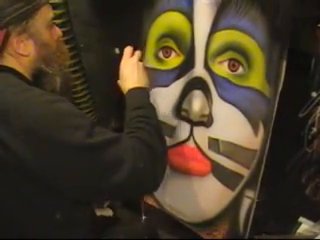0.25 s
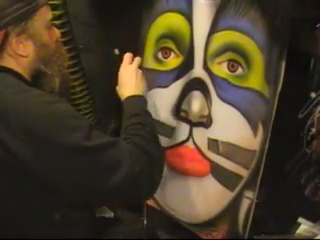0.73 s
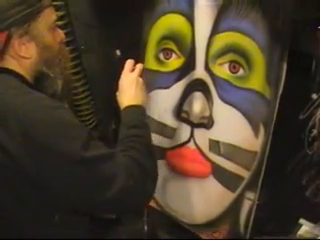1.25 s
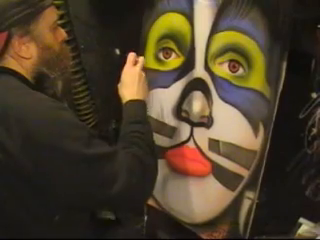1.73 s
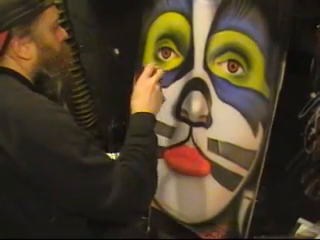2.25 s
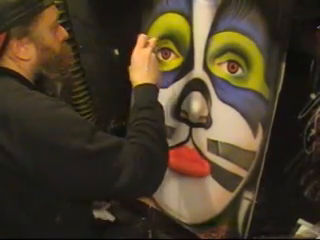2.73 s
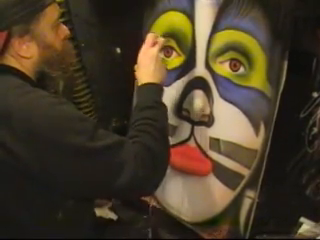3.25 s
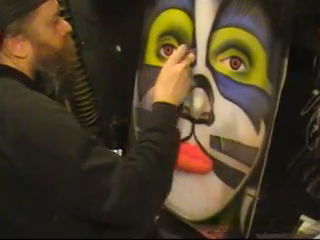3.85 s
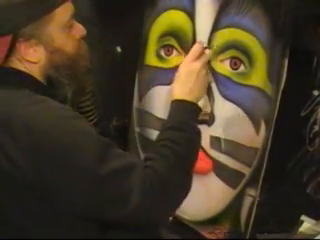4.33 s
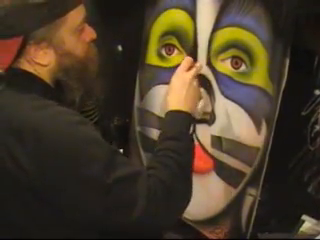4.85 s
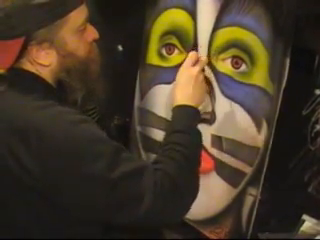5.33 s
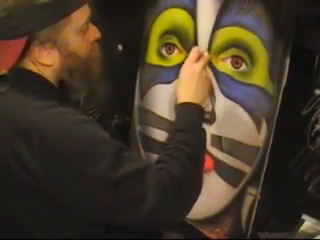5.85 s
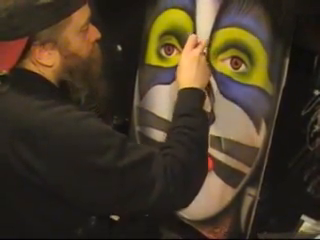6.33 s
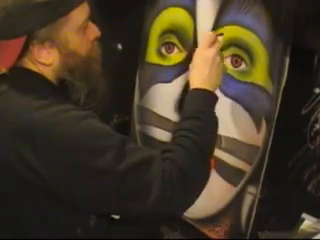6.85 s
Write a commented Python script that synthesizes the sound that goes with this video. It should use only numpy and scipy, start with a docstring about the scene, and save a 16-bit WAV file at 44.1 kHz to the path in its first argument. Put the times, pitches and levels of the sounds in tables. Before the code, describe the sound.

An airbrush is already spraying at the start, a bright, close hiss of air that flutters slightly in tone. During this first stroke the jet also drums softly on the stretched canvas, adding an uneven low rumble. The hiss cuts off at about 2.3 seconds, returns at 2.4 and runs until 3.5. In the pause, at 3.8 seconds, the valve gives one short, sharp spit of air. A louder stroke runs from 4 to about 5.8 seconds. After a brief gap, the last stroke starts at 6 seconds and swells until the end, at around 7 seconds. Beneath it all are a faint, deep hum that wavers in pitch, a faint fan and steady room air. The space is a small studio with very little echo.

```python
"""An airbrush is already hissing in a small studio, its air jet drumming on the canvas for the first stroke.
A second stroke follows, then the valve spits once in the pause, at 3.8 s. Two louder strokes carry
the hiss to the end. A wavering low hum, a faint fan and room air lie beneath all of it, and the
camcorder notches out every multiple of its tape drum's rate throughout."""
import sys
import numpy as np
from scipy import signal
from scipy.fft import rfft, irfft, next_fast_len
from scipy.io import wavfile
from scipy.ndimage import uniform_filter1d

SR = 44100
rng = np.random.default_rng(int(sys.argv[2]) if len(sys.argv) > 2 else 0)


def generate_wav(sig):
    """Save sig (samples, or channels by samples) to the path in sys.argv[1] as 16-bit PCM at SR."""
    pcm = np.round(np.clip(np.atleast_2d(sig).T, -1, 1) * 32767).astype(np.int16)
    wavfile.write(sys.argv[1], SR, pcm)


N = 312655
T = np.arange(N) / SR
FFT_SIZE = next_fast_len(N)
HZ = np.arange(FFT_SIZE // 2 + 1) * SR / FFT_SIZE + 1e-3

# Fader and tone rides, one list per stroke; each tone ride acts by its swing about its own average:
# (time [s], relative hiss level [dB], canvas roar [dB], nozzle ring [dB], top end [dB])
STROKE_RIDES = [
    [(0.0, -30, -5, -4, 0), (0.02, -28, -7, -5, -2), (0.36, -29, -5, -1, -2), (0.48, -28, -7, -5, -1),
     (0.79, -29, -6, -2, -2), (0.88, -30, -10, -7, -3), (0.98, -29, -5, 1, -2), (1.12, -27, -8, -3, -3),
     (1.23, -28, -12, -10, -3), (1.32, -29, -6, 1, -3), (1.46, -28, -7, -4, -2), (1.48, -26, -7, -3, -4),
     (1.58, -29, -10, -6, -1), (1.75, -30, -8, -6, -2), (1.76, -32, -8, 0, 1), (1.77, -27, -7, -4, -5),
     (1.87, -29, -5, 0, -1), (2.12, -27, -8, -3, -3), (2.14, -26, -9, 0, -4), (2.21, -28, -8, -7, -3),
     (2.25, -28, -9, -6, -1)],
    [(2.45, -27, -8, -6, -3), (2.512, -26, -6, -1, -3), (2.624, -27, -6, -3, -3), (2.71, -30, -8, -7, -2),
     (2.758, -28, -6, -2, -3), (3.038, -28, -7, -2, -2), (3.172, -29, -7, -6, 0), (3.196, -29, -5, -2, -3),
     (3.282, -27, -8, -5, -4), (3.42, -26, -8, -2, -2), (3.436, -27, -10, -6, -3), (3.53, -27, -8, -7, -3)],
    [(3.975, -24, -9, -7, -2), (4.087, -23, -8, -6, -3), (4.187, -24, -12, -9, -3),
     (4.221, -26, -6, -3, -1), (4.231, -24, -11, -3, -4), (4.289, -22, -9, -7, -3),
     (4.773, -24, -9, -6, -3), (4.793, -24, -12, -9, -2), (4.999, -27, -10, -6, -1),
     (5.015, -25, -9, -3, -3), (5.143, -22, -11, -7, -5), (5.173, -23, -9, -6, -3),
     (5.265, -24, -11, -11, -2), (5.315, -23, -10, -5, -5), (5.443, -25, -7, -4, -1),
     (5.473, -25, -12, -9, -3), (5.551, -23, -11, -4, -4), (5.679, -22, -9, -5, -4),
     (5.745, -25, -11, -11, -2)],
    [(5.975, -27, -10, -8, -2), (6.191, -26, -7, -3, -3), (6.315, -26, -9, -10, 0),
     (6.377, -25, -8, -4, -3), (6.517, -24, -8, -7, -3), (6.533, -24, -12, -12, -5),
     (6.601, -26, -13, -11, -2), (6.687, -26, -8, -4, -2), (6.899, -23, -9, -7, -4),
     (7.081, -21, -10, -8, -2), (7.09, -20, -11, -9, -5)],
]
# Tone of the hiss: (frequency [Hz], relative level [dB])
JET_EQ = [(210, -51), (350, -21), (447, -25), (646, -17), (1070, -17), (1860, -10), (2760, -11), (3120, -5),
          (3700, -10), (4310, -2), (5250, -4), (6920, 0), (10100, -4), (12000, -15), (13600, -29)]
# Stereo width of the hiss: (frequency [Hz], side against mid [dB])
JET_WIDTH = [(60, -9), (110, -2), (200, -4), (360, -5), (660, -8), (1200, -21), (2180, -37), (3960, -15),
             (7210, -14), (13100, -7)]
ROAR_HZ, RING_HZ, HISS_HZ, TOP_HZ = 2800, 4600, 6500, 10000  # where each ride acts most


def air_jet():
    """Turbulent air hisses from the nozzle; each third-octave band flutters on its own."""
    times, *rides = np.vstack(STROKE_RIDES).T
    hiss_db, roar_db, ring_db, top_db = (np.interp(T, times, ride) for ride in rides)
    swings = [ride - ride.mean() for ride in (roar_db, ring_db, np.zeros(N), top_db)]
    mid, side = rfft(rng.standard_normal((2, FFT_SIZE))) * eq_curve(JET_EQ)
    spectrum = stereo(mid, side * eq_curve(JET_WIDTH))
    hiss = 0
    for centre_hz in 320 * 2 ** (np.arange(17) / 3):
        window = np.cos(np.pi / 2 * np.clip(3 * np.log2(HZ / centre_hz), -1, 1)) ** 2
        band = irfft(spectrum * window, FFT_SIZE)[:, :N]
        # crossfade between the two nearest rides
        place = np.interp(np.log(centre_hz), np.log([ROAR_HZ, RING_HZ, HISS_HZ, TOP_HZ]), np.arange(4))
        below = min(int(place), 2)
        blend = place - below
        tone_db = (1 - blend) * swings[below] + blend * swings[below + 1]
        hiss = hiss + band * undb(tone_db + 1.2 * flutter(rate_hz=9))
    grain = undb(1.6 * flutter(rate_hz=700))  # eddies and paint droplets
    return at_level(hiss * grain, 3.5) * undb(hiss_db)


# Trigger presses, one per stroke: (open time [s], shut time [s])
TRIGGER_CUES = [(-1, 2.262), (2.437, 3.538), (3.960, 5.758), (5.958, 8)]


def valve_gate():
    """Air flow, 0 to 1: the valve snaps open and closes more slowly as the pressure bleeds off."""
    flow = np.zeros(N)
    for opens, shuts in TRIGGER_CUES:
        attack = 1 - np.exp(-np.clip(T - opens, 0, 1) / .004)
        release = np.exp(-np.clip(T - shuts, 0, 9) / .008)
        flow += attack * release
    return flow


# Drumming under the first stroke: (time [s], relative level [dB], upper modes against lower [dB])
CANVAS_RIDE = [(0.0, -49, 0), (0.04, -45, -6), (0.06, -54, 4), (0.18, -40, -1), (0.25, -36, 8),
               (0.3, -34, 2), (0.35, -40, 9), (0.37, -34, 0), (0.45, -42, 5), (0.52, -36, -1),
               (0.57, -42, -2), (0.77, -37, 5), (0.89, -47, -4), (0.91, -53, 2), (0.99, -38, -7),
               (1.01, -40, 0), (1.03, -38, -5), (1.19, -59, 10), (1.24, -53, 0), (1.38, -41, -3),
               (1.57, -61, 10), (1.61, -52, 3), (1.63, -61, 7), (1.74, -44, 1), (1.8, -41, -5),
               (1.83, -44, 3), (1.88, -39, -3), (1.95, -54, 6), (2.15, -63, 17)]
# Lower and upper resonances of the cloth: (frequency [Hz], width [Hz], relative level [dB])
CANVAS_LOW_MODES = [(230, 70, 0), (350, 110, -1), (500, 60, -4)]
CANVAS_HIGH_MODES = [(660, 70, 0), (830, 120, 0), (960, 60, -3), (1100, 60, -2)]


def canvas_drumming():
    """The stretched cloth rumbles in its modes where the jet presses close."""
    times, db, upper_db = np.transpose(CANVAS_RIDE)
    low = noise(resonances(CANVAS_LOW_MODES))
    high = noise(resonances(CANVAS_HIGH_MODES))
    low = at_level(low, -.3) * undb(np.interp(T, times, db, right=-90))
    high = at_level(high, -.3) * undb(np.interp(T, times, db + upper_db, right=-90))
    return (low + high) * undb(1.5 * flutter(rate_hz=60))


# The spit between strokes: (time [s], relative level [dB], time to fall 60 dB [s])
SPIT_CUES = [(3.829, -29, .1)]
# Its mid-heavy tone: (frequency [Hz], relative level [dB])
SPIT_EQ = [(290, -49), (500, -19), (1490, -4), (1780, -11), (2860, 0), (3460, -14), (5430, -20),
           (10200, -45), (13000, -67)]


def valve_spit():
    """The valve lets out a short burst of air with a sharp attack."""
    envelope = 0
    for start, db, t60 in SPIT_CUES:
        age = np.clip(T - start, 0, 9)
        attack = 1 - np.exp(-age / .002)
        envelope = envelope + attack * undb(db - 60 * age / t60)
    return envelope * at_level(noise(eq_curve(SPIT_EQ)), .1)


# Pitch and fader ride of the hum: (time [s], pitch [Hz], level [dB])
HUM_RIDE = [(0.0, 60.1, -64), (0.1, 56.1, -48), (0.53, 54.6, -52), (0.59, 53.4, -60), (0.67, 50.4, -57),
            (1.32, 50.4, -46), (1.54, 50.6, -56), (1.66, 56.6, -56), (1.81, 52.9, -50), (1.95, 53.7, -58),
            (2.05, 54.9, -51), (2.15, 50.9, -54), (2.35, 49.1, -57), (2.41, 49.5, -49), (2.65, 53.3, -51),
            (3.08, 53.2, -48), (3.22, 54.7, -48), (3.35, 54.5, -53), (3.45, 54.4, -44), (3.83, 54.6, -49),
            (4.05, 54.5, -44), (4.4, 54.6, -51), (4.5, 52.0, -56), (4.64, 54.9, -56), (4.72, 55.9, -47),
            (5.23, 56.0, -52), (5.39, 49.1, -52), (5.57, 49.1, -50), (5.69, 54.1, -46), (5.75, 55.7, -50),
            (5.82, 53.5, -46), (5.9, 53.1, -53), (6.18, 53.3, -52), (6.28, 56.0, -48), (6.48, 55.8, -48),
            (6.57, 58.0, -52), (6.85, 60.0, -55), (7.01, 54.0, -55), (7.09, 52.8, -48)]


def low_hum():
    """A deep sine tone wavers in pitch and level."""
    times, hz, db = np.transpose(HUM_RIDE)
    phase = 2 * np.pi * np.cumsum(np.interp(T, times, hz)) / SR
    envelope = undb(np.interp(T, times, db) + 1.5 * flutter(rate_hz=12))
    hum = np.sqrt(2) * np.sin(phase) * envelope
    return stereo(hum, .15 * hum[::-1])  # a reversed copy adds a little width


# Bass-heavy bed of room air: (frequency [Hz], relative level [dB])
AIR_EQ = [(15, -31), (25, -1), (75, 0), (114, -15), (203, -15), (285, -34), (750, -37), (925, -36),
          (1230, -43), (2570, -41), (8330, -44), (10300, -46), (13000, -67)]
# The fan's note: (frequency [Hz], width [Hz], level [dB])
FAN_TONE = [(185, 8, -62)]


def room_tone():
    """Steady, wide room air with a narrow fan tone in the centre."""
    gain = eq_curve(AIR_EQ)
    air = at_level(stereo(noise(gain), .45 * noise(gain)), db=-52)
    fan = at_level(noise(resonances(FAN_TONE)), db=FAN_TONE[0][2])
    return air + fan


def studio_reverb(x, t60_s=.2, wet_db=-12):
    """The walls add a short diffuse tail, a little different at each ear."""
    t = T[:int(.4 * SR)]
    mid, side = rng.standard_normal((2, len(t))) * undb(-60 * t / t60_s) * (t > .004)
    tail = stereo(mid, .3 * side) / np.sqrt(np.sum(mid ** 2))
    wet = signal.fftconvolve(x.mean(axis=0)[None], tail, axes=1)[:, :N]
    return x + undb(wet_db) * wet


def undb(db):
    return 10 ** (np.asarray(db) / 20)


def at_level(x, db):
    """Scales to an rms level."""
    return x * undb(db) / np.sqrt(np.mean(x ** 2))


def eq_curve(points):
    """Gain through EQ points joined on a log-frequency axis."""
    hz, db = np.transpose(points)
    return undb(np.interp(np.log(HZ), np.log(hz), db))


def resonances(modes):
    """Gain of summed resonant peaks."""
    return sum(undb(db) / (1 + ((HZ - hz) / (width / 2)) ** 2) for hz, width, db in modes)


def noise(gain):
    """Noise with the given gain at each frequency."""
    return irfft(rfft(rng.standard_normal(FFT_SIZE)) * gain, FFT_SIZE)[:N]


def flutter(rate_hz):
    """Random sample-and-hold, smoothed twice; spread near 1."""
    hold = int(SR / rate_hz)
    steps = np.repeat(rng.standard_normal(N // hold + 1), hold)
    return 1.3 * uniform_filter1d(uniform_filter1d(steps, hold), hold)[:N]


def stereo(mid, side):
    return np.array([mid + side, mid - side])


def scene():
    """The airbrush and its reverb over the background bed, leaning slightly right."""
    airbrush = air_jet() * valve_gate() + canvas_drumming() + valve_spit()
    balance = undb([[-.25], [.25]])
    return (studio_reverb(airbrush) + room_tone() + low_hum()) * balance


def record(dry):
    """The camcorder subtracts what repeats every drum turn, less so in the treble, then cuts the top."""
    drum_hz, cutoff_hz = 150, 13750
    memory = .53  # share of older turns in the running average
    turn_delay = np.exp(-2j * np.pi * HZ / drum_hz) * .93 / (1 + (HZ / 14000) ** 2)
    comb = (1 - turn_delay) / (1 - memory * turn_delay)
    notched = irfft(rfft(dry, FFT_SIZE) * comb, FFT_SIZE)[:, :N]
    high_cut = signal.ellip(10, .2, 80, cutoff_hz, fs=SR, output="sos")
    return signal.sosfilt(high_cut, .8 * notched)


dry = scene()
out = record(dry)
generate_wav(out)
```